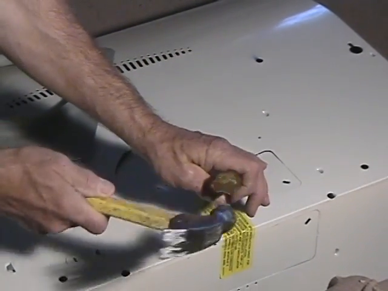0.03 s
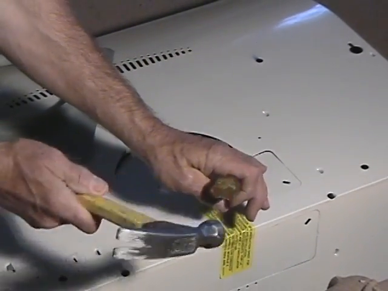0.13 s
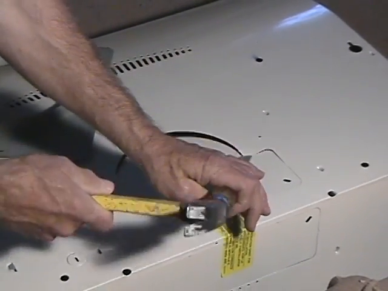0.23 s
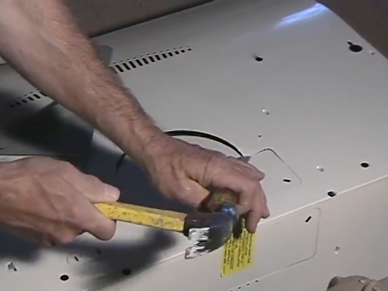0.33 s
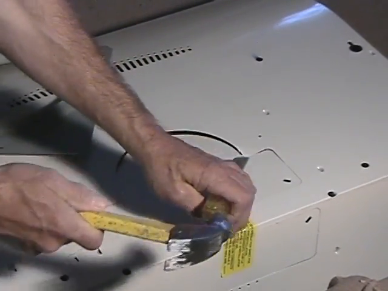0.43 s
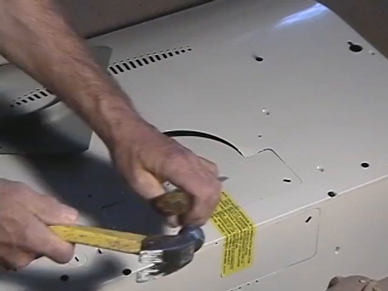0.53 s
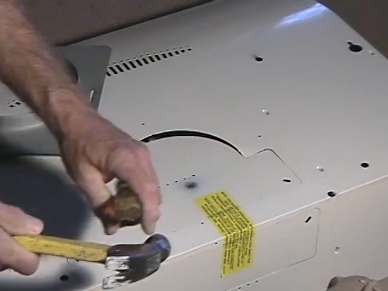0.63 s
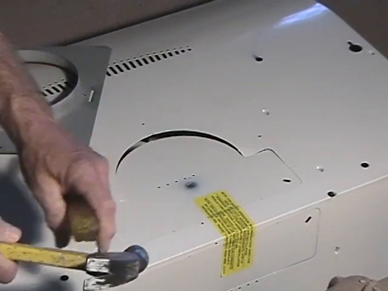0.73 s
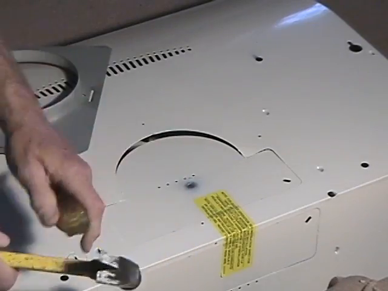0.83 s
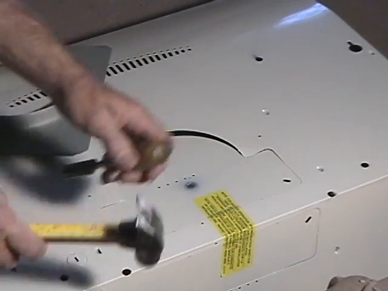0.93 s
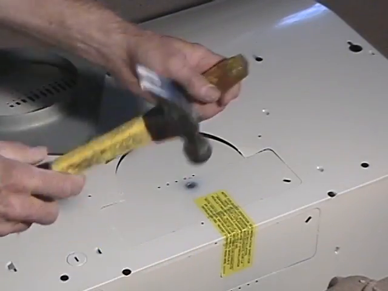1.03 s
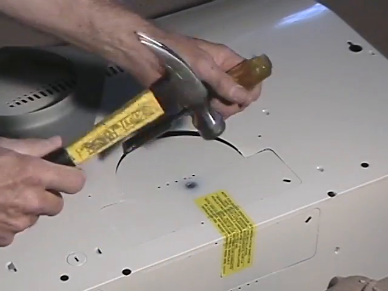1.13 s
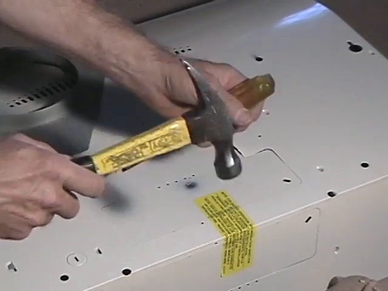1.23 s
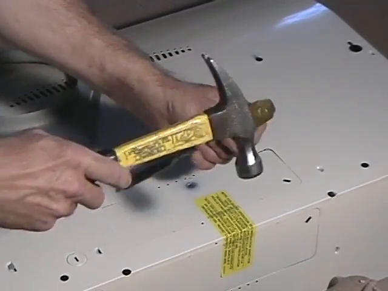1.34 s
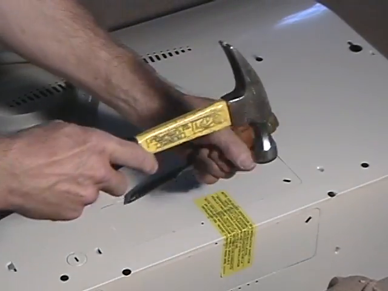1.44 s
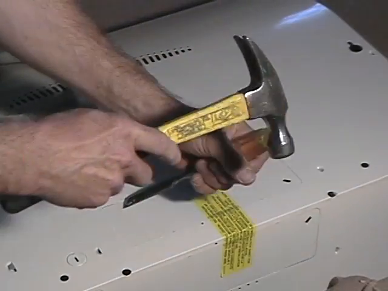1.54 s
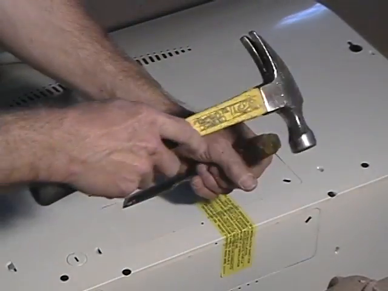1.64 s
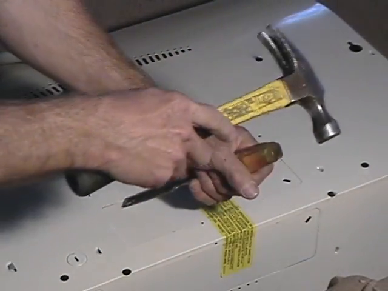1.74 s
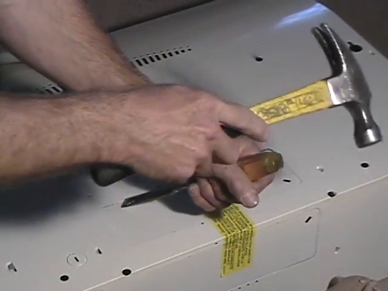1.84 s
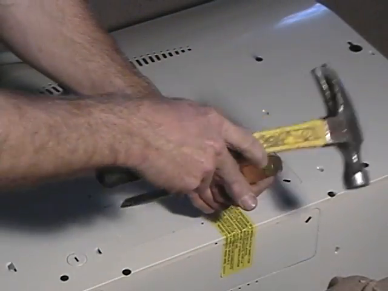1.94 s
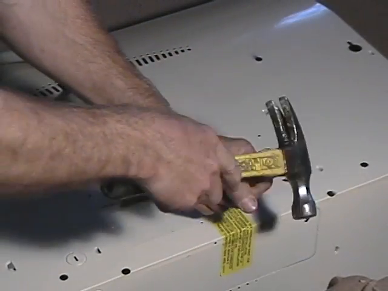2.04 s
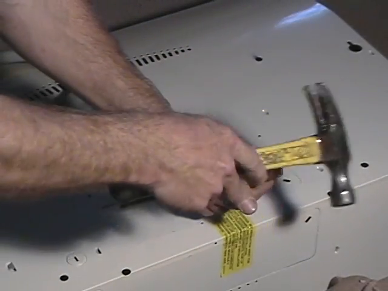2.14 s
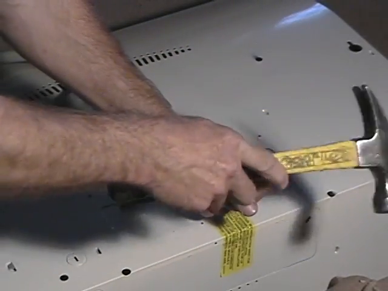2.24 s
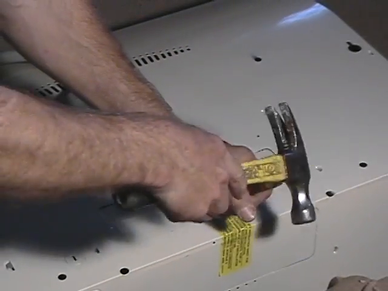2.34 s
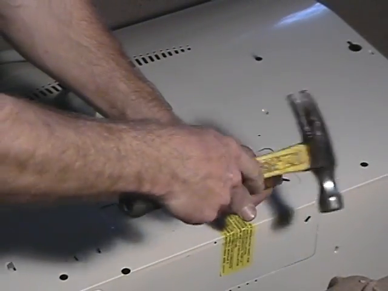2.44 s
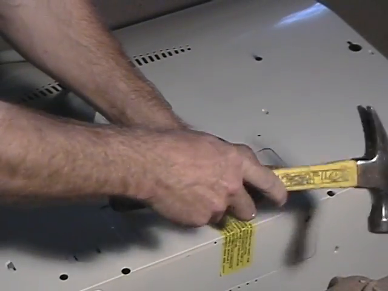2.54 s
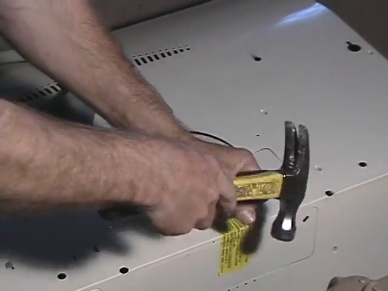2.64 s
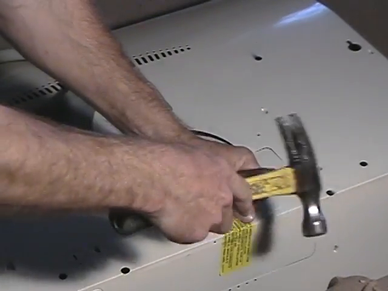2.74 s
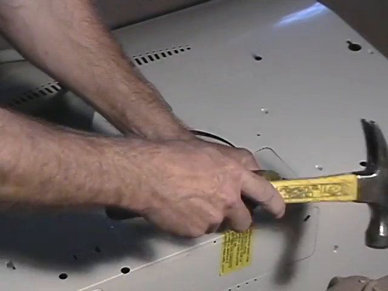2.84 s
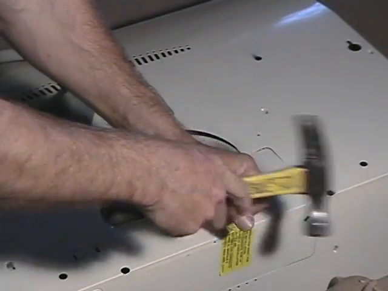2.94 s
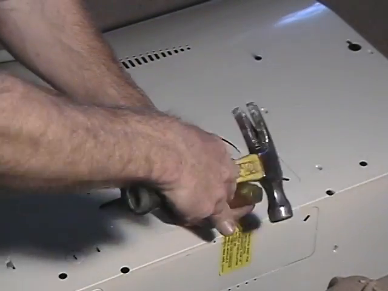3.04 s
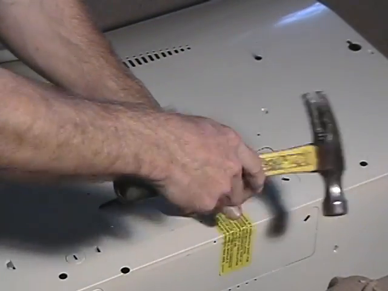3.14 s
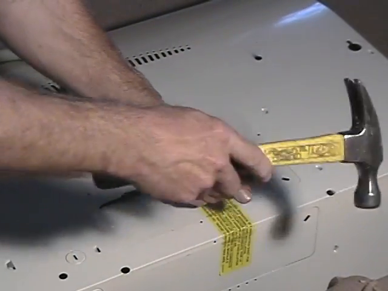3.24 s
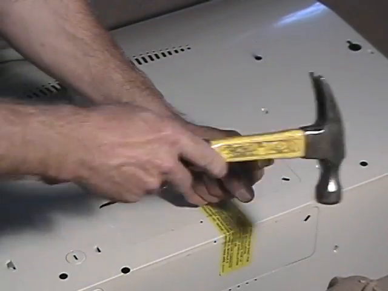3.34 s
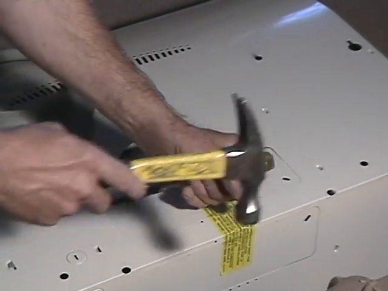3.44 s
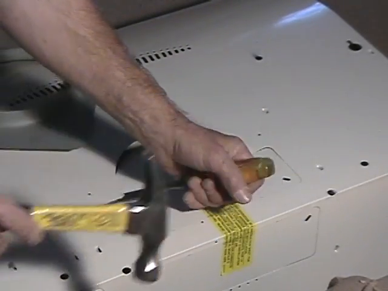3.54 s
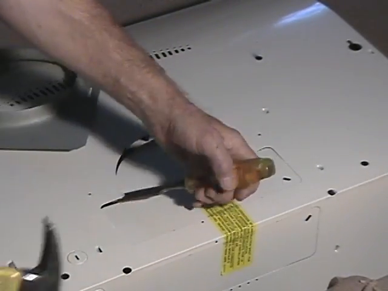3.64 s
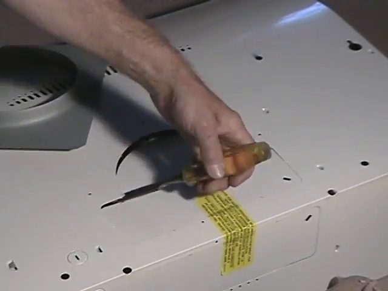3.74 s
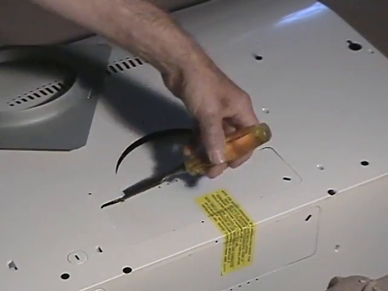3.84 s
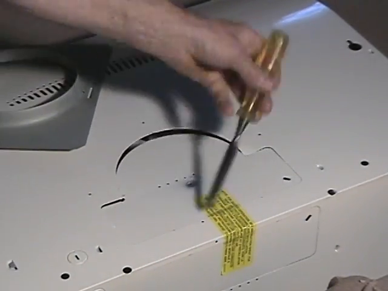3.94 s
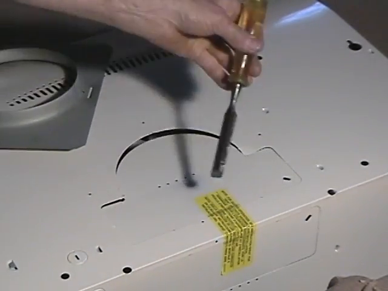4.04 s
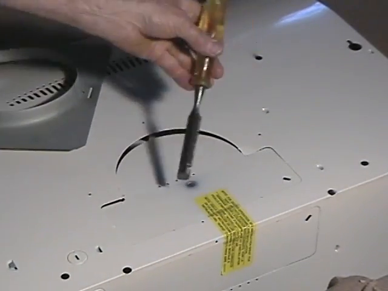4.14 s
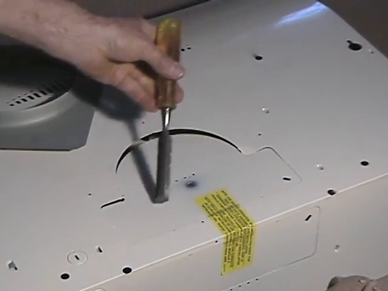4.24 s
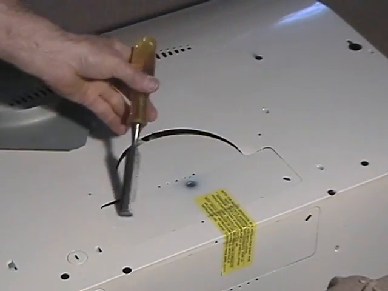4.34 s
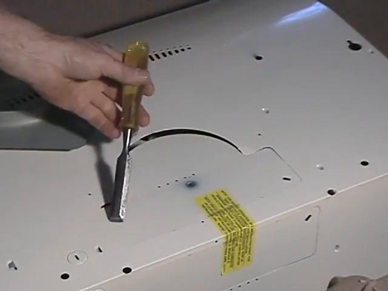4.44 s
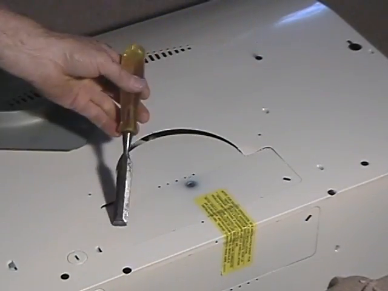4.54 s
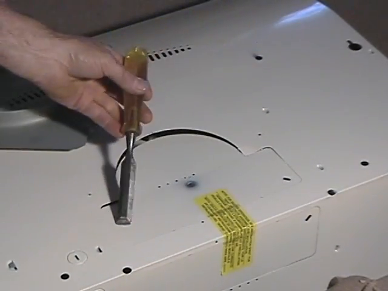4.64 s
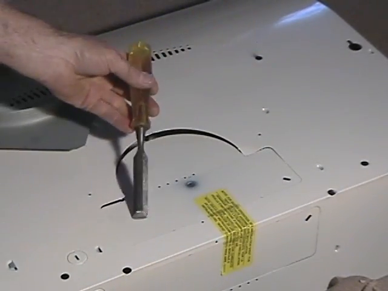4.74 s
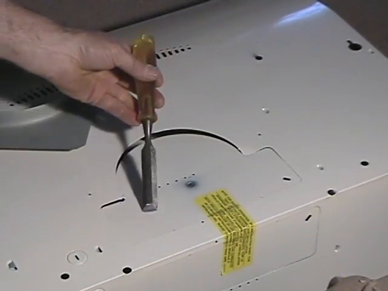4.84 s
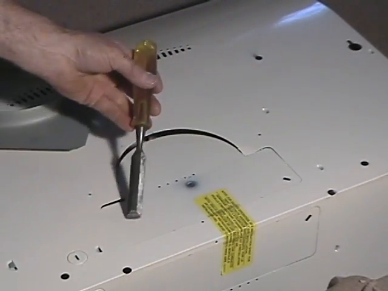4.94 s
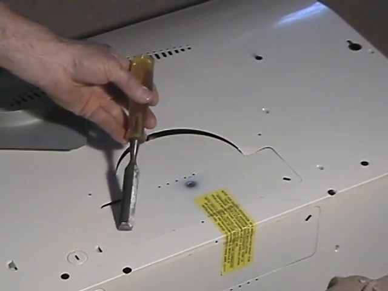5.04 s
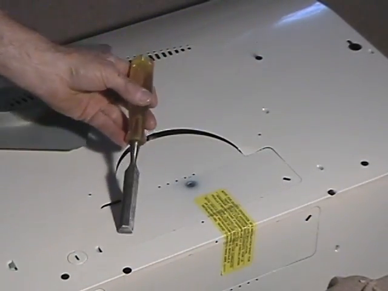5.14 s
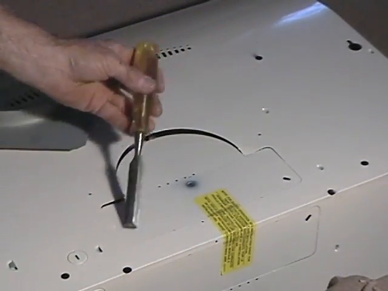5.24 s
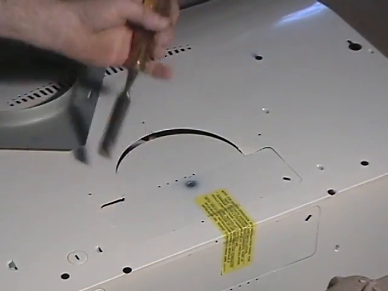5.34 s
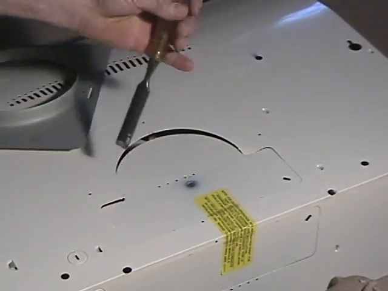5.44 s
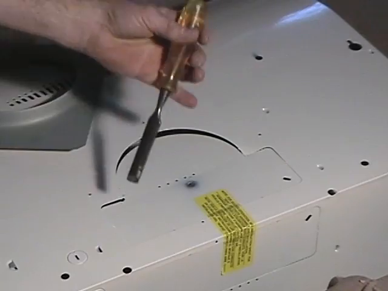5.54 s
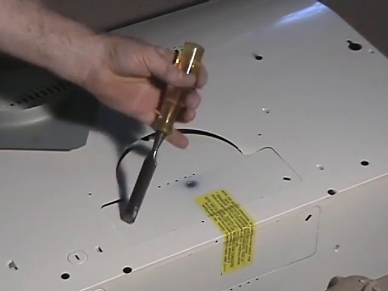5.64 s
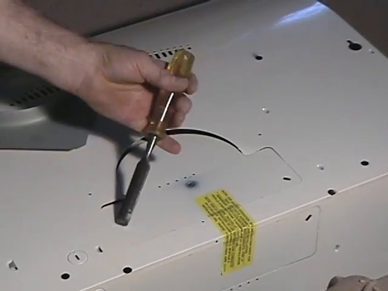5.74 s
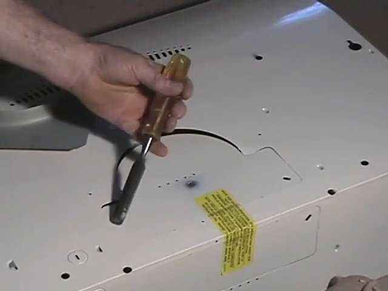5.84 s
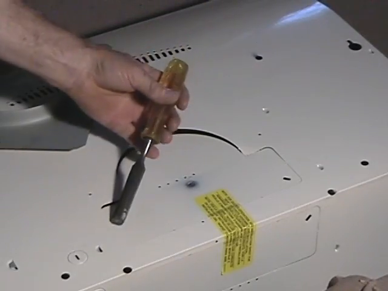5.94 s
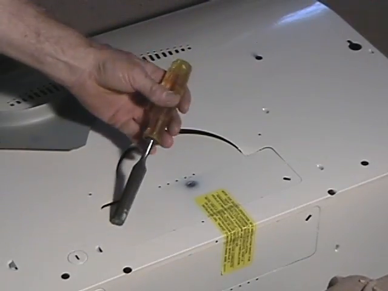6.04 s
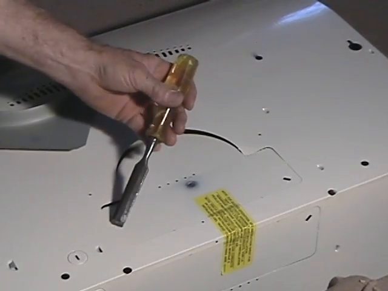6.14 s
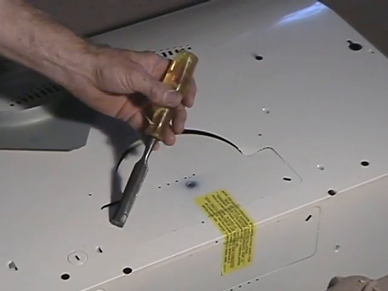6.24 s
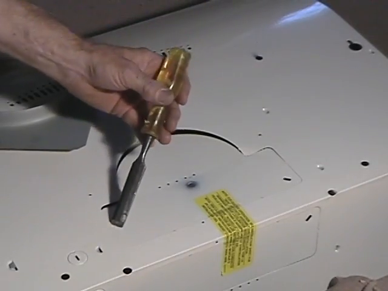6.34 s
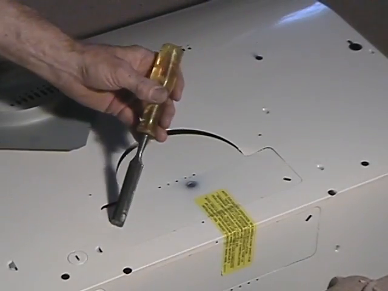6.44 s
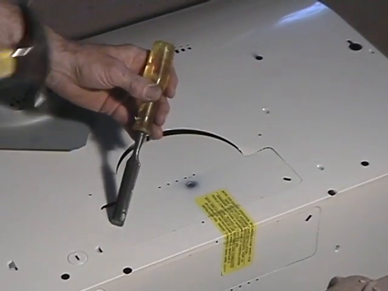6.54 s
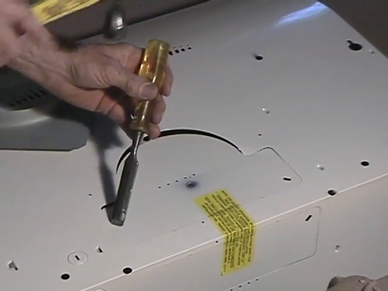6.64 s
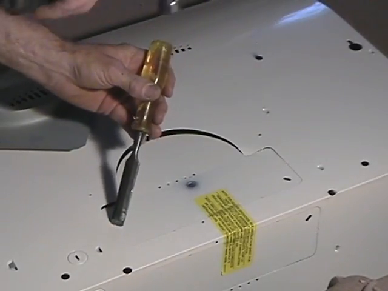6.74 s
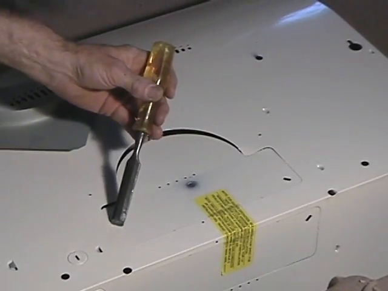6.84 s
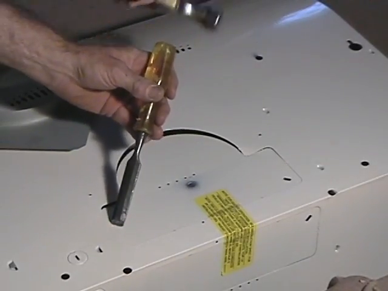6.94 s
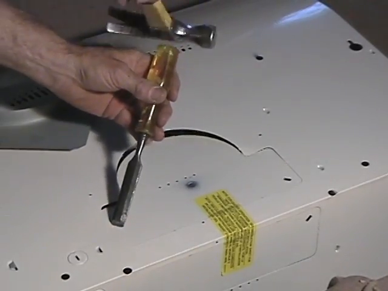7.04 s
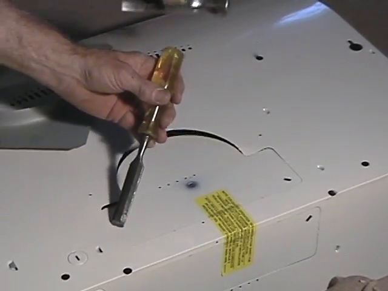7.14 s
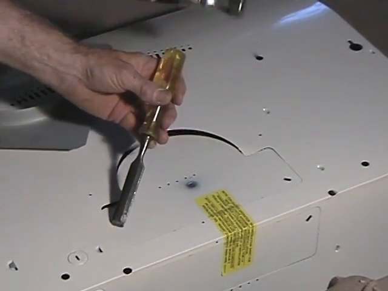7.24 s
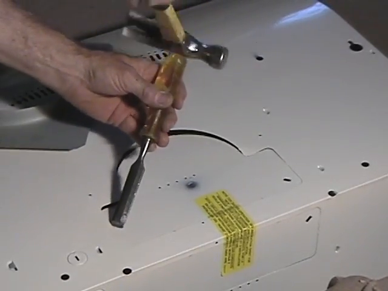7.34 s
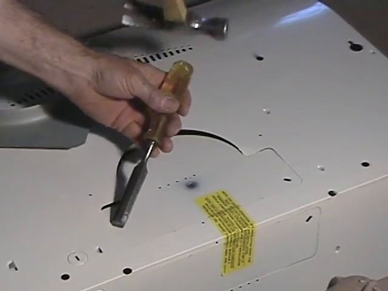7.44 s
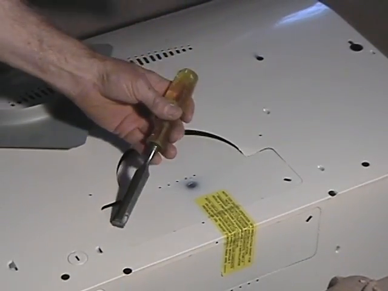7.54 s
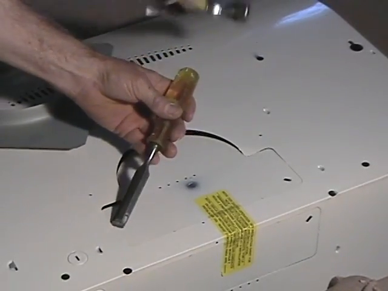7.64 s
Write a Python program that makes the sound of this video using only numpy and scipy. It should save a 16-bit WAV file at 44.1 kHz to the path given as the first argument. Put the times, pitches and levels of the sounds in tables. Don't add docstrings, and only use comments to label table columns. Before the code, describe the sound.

Sharp hammer blows on a chisel clang through a thin sheet-metal cabinet, with light taps and a brief scrape between two runs, over faint ventilation.

```python
import sys
import numpy as np
from scipy import signal
from scipy.fft import rfft, irfft, next_fast_len
from scipy.io import wavfile

SR = 44100
rng = np.random.default_rng(int(sys.argv[2]) if len(sys.argv) > 2 else 0)


def field_ratio(decibels):
    return 10 ** (np.asarray(decibels, dtype=float) / 20)


def inscribe(sig):
    pcm = np.round(np.clip(np.atleast_2d(sig).T, -1, 1) * 32767)
    wavfile.write(sys.argv[1], SR, pcm.astype(np.int16))


N = 339570
LEAD = 4410
BAND_EDGES_HZ = 25 * 2 ** np.arange(0, 9.5, 1 / 3)

# (time [s], peak [dB], treble [dB], bass [dB], long ring [dB])
BLOWS = [
    (0.252, -11, -11, -22, -7),
    (2.036, -8.5, -12, -15, -17.5),
    (2.354, -9.5, -11.5, -13, -10),
    (2.656, -11, -10.5, -16, -19.5),
    (2.989, -11.5, -9, -15, -17.5),
    (7.011, -9, -13.5, -13, -7),
    (7.329, -9, -10.5, -18.5, -11.5),
]
# (time [s], peak [dB], treble [dB], bass [dB], long ring [dB])
TAPS = [(1.527, -31.5, -28, -3, -2), (3.874, -31.5, -40, -15, -15), (1.561, -27, -19.5, -13, -4.5),
        (4.291, -9, -10.5, -23, -8.5), (4.339, -13.5, -39, -5.5, -13), (4.409, -14, -20.5, -28, -27),
        (4.768, -41.5, -17, 5, -27), (5.049, -29.5, -20.5, -37, -4), (5.096, -28.5, -46, -27, -13),
        (5.311, -44, -23, -12, -5), (5.688, -19, -10.5, -11, -17), (5.711, -21.5, -27, -16, -3.5),
        (5.808, -18.5, -21, -16, -25)]
# (time [s], peak [dB], treble [dB], bass [dB], long ring [dB])
EARLIER_BLOW = [(-0.036, -11, -11.5, -17.5, -20)]
CONTACTS = EARLIER_BLOW + BLOWS + TAPS
# (time [s], bite [dB])
DRAG_BITE = [
    (3.872, -78),
    (3.885, -60),
    (3.904, -37.5),
    (3.934, -32),
    (3.955, -51),
    (4.005, -54.5),
    (4.03, -74),
    (4.07, -75),
]
# (time [s], peak [dB], fade [dB/s])
SIZZLES = [(0.105, -38, 115), (0.391, -36, 450), (0.444, -39, 64), (0.611, -42.5, 230), (0.668, -54, 200),
           (0.785, -49.5, 302), (1.02, -65, 25), (2.43, -44, 400), (2.5, -46.5, 72), (2.62, -63, 100),
           (2.8, -52, 220), (4.298, -33, 250), (4.415, -48, 150), (5.265, -56.5, 150), (5.36, -65, 80),
           (6.05, -63, 10), (6.15, -72, 25), (7.014, -22, 302), (7.15, -48, 350), (7.224, -43, 700),
           (7.28, -45, 353), (7.332, -38, 300), (7.595, -62, 393)]
# (frequency [Hz], density [dB per Hz])
SHEET_COLOUR = [(35, -63), (60, -38), (136, -14), (217, -12), (427, -4), (621, -6.5), (698, -7), (749, -10),
                (968, -7), (1580, -8.5), (1910, -10.5), (4640, -19.5), (9350, -21.5), (13300, -16.5),
                (16000, -37)]
# (frequency [Hz], density [dB per Hz])
SIZZLE_COLOUR = [(2000, -10), (5000, -4), (9000, -7.5), (11500, -9.5), (14000, -16.5), (16000, -13)]
# (frequency [Hz], T60 [s])
FAST_T60 = [(100, 0.93), (300, 0.39), (1000, 0.49), (3000, 0.36), (7000, 0.31), (14000, 0.18)]
# (frequency [Hz], T60 [s])
LONG_T60 = [(100, 2.5), (300, 1.28), (1000, 0.83), (3000, 0.7), (7000, 0.54), (14000, 0.37)]
# (frequency [Hz], T60 [s], first spot [dB], second spot [dB], set-down [dB], last
# spot [dB])
PANEL_MODES = [(158, 0.54, -16, -12, -12, -17.5), (213.2, 1, -18, -32, -22.5, -23),
               (250, 1, -16.5, -18, -14, -20.5), (282, 1, -15, -16.5, -11, -13),
               (345.3, 0.27, -8.5, -22, -6, -17), (392, 0.9, -12, -11, -9.5, -7),
               (448, 0.37, -11, -4, -4.5, -11), (488.5, 1, -17, -26, -11, -30),
               (560, 0.36, -1.5, 4.5, -7.5, 1), (683, 1, -14.5, -18.5, -12.5, -17),
               (782.4, 0.86, -21.5, -22, -14.5, -19), (815, 0.18, -3.5, -32.5, -17, -20),
               (970, 0.41, -6.5, -2.5, -6.5, -7), (1076, 0.26, 1, -2, -6, -7), (1229, 0.18, 3.5, -6, -0.5, -13),
         (1334, 0.21, 3, 3, 0, -25), (1417, 0.23, -9, 2, -2.5, -16), (1430, 0.48, -28, -11, -12.5, -14),
         (1585, 0.32, -21, -13.5, -11, -5), (1667, 0.093, 2.5, -5, -3, -17), (1755, 0.21, 1, 3, -26, -13),
         (1871, 0.085, -26, -8.5, -2, 2.5), (2140, 0.37, -31, -5.5, -5.5, -10),
         (2336, 0.27, -9, -4.5, -8, -8)]
# (frequency [Hz], left-right likeness [-1..1])
SHEET_LIKENESS = [(60, 0.84), (250, 1), (500, 0.99), (1000, 0.96), (2000, 0.8), (4000, 0.69), (8000, 0.52),
                  (13000, 0.52)]
# (frequency [Hz], left minus right [dB])
SHEET_BALANCE = [(700, -0.8), (2000, -0.5), (4000, -1), (8000, 0.9), (13000, -1.5)]
# (frequency [Hz], density [dB per Hz])
ROOM_COLOUR = [(25, -27), (60, -12), (90, -19.5), (130, -4), (250, -1), (450, -2), (700, -5.5), (1400, -9),
               (2000, -12.5), (3000, -19), (4500, -22), (6000, -23), (12000, -24), (16000, -27)]
# (frequency [Hz], left-right likeness [-1..1])
ROOM_LIKENESS = [(60, 0.28), (150, 0.77), (380, 1), (950, 0.89), (2380, 0.39), (5980, -0.085),
                 (15000, -0.31)]
# (frequency [Hz], level [dB rms])
WHISTLES = [(60, -82.5), (4527, -78), (15735, -76)]
# (frequency [Hz], width [Hz], level [dB rms])
DUCTS = [(477, 91, -60.5), (1050, 76, -87), (1480, 100, -61.5), (1650, 50, -83), (4330, 220, -73)]
PANEL_RING = [1.17, 0.86, 0.62, 0.91]
SHEET_RING = [1.565, 1.176, 0.84, 0.98]
PLACE_FROM_S = [1.2, 3.5, 6.5]
SET_DOWN = 2
# (frequency [Hz], width [Hz], level [dB])
LOOSE_PARTS = [(8900, 65, -11.5), (9250, 41, -13.5), (10680, 140, 0), (11100, 32, 1), (11200, 160, -5.5),
               (11400, 25, -15), (12100, 64, 1), (12600, 130, -2), (13500, 68, 0.5), (11800, 28, -9),
               (13700, 75, 0), (13050, 35, -5), (14500, 46, -4), (15100, 71, -5)]
# (frequency [Hz], level [dB], T60 [s])
STEEL_MODES = [(1500, -1.5, 0.011), (2570, -0.5, 0.004), (4640, -6, 0.0021), (6850, -8, 0.003),
               (12500, -7, 0.002)]
# (frequency [Hz], level [dB], T60 [s])
FREE_PANELS = [(190, -48.5, 2.7), (249.3, -36.5, 2.27), (390, -38.5, 1.63), (476, -54, 1.6),
               (549, -35, 1.8), (711, -38, 1.97), (985, -39.5, 1.73)]
# (time [s], frequency [Hz], level [dB])
NOTES = [(.002, 1350, -26.5), (.002, 560, -27.5), (0.256, 950, -26), (0.255, 1110, -28),
         (1.526, 392.5, -35), (2.038, 560, -30), (2.036, 1050, -21), (2.038, 392, -27.5),
         (2.358, 1670, -22), (2.359, 419, -28), (2.66, 1187, -21), (2.66, 1399, -26), (2.661, 158, -35.5),
         (2.993, 436.5, -26), (5.851, 1450, -34.5), (3.95, 392, -30), (4.301, 260.4, -24.5),
         (4.3, 305, -30), (4.418, 267, -46), (5.05, 1122, -39), (5.095, 1430, -37.5), (5.096, 1214, -33.5),
         (5.699, 158, -41), (5.712, 1480, -30.5), (5.82, 1430, -38), (5.82, 477, -44), (7.015, 692, -25),
         (7.021, 395, -29), (7.332, 676, -31), (7.339, 395, -32)]
NOTCHES = [(1, 0.82, 0.73), (2, 0.87, 0.76)]


def sheet():
    buzz = edge_sizzle() * field_ratio(2.0 * drift(120))
    out = 0
    for hz, pair in bands():
        struck = field_ratio(2 * at_hz(SHEET_COLOUR, hz) + 2 * 7.58) * sheet_energy(hz)
        loose = (field_ratio(at_hz(SIZZLE_COLOUR, hz) + 6.0) * buzz) ** 2
        lean = field_ratio(at_hz(SHEET_BALANCE, hz) / 2 * np.array([[1], [-1]]))
        out = out + np.sqrt(struck + loose) * lean * spread(pair, at_hz(SHEET_LIKENESS, hz))
    shaking = buzz + field_ratio(-22) * drag_gain() + field_ratio(-35) * np.sqrt(sheet_energy(11000))
    return out + loose_parts(shaking)


def sheet_energy(hz):
    energy = np.zeros(N)
    fast_s, long_s = at_hz(FAST_T60, hz), at_hz(LONG_T60, hz)
    rise_s = 0.00014 + 2.6 / hz
    for s, db, treble_db, bass_db, ring_db in CONTACTS:
        place = np.searchsorted(PLACE_FROM_S, s) if db > -25 else SET_DOWN
        length = SHEET_RING[place]
        soft_rise_s = 0.004 * (place == SET_DOWN and db > -25)
        soft_top_db = -9.0 * (place == SET_DOWN)
        first = max(round(s * SR), 0)
        t = np.arange(first, min(first + SR, N)) / SR - s
        tilt_db = at_hz([(200, bass_db + 11), (400, 0.0027), (2000, 0.018), (5000, treble_db + 11),
                         (11000, treble_db + 12), (15000, treble_db + 16.5 + soft_top_db)], hz)
        dying = field_ratio(-120 * t / (fast_s * length)) + field_ratio(2 * ring_db - 120 * t / (long_s * length))
        rising = (1 - np.exp(-np.abs(t) / (rise_s + soft_rise_s))) ** 2
        energy[first:first + len(t)] += field_ratio(2 * (db + tilt_db)) * dying * rising
    share = at_hz([(2500, 0), (5000, 0.38)], hz)
    drag = drag_push() ** (1 - share) * (field_ratio(10.0) * drag_gain()) ** share
    drag = drag * field_ratio(at_hz([(150, -0.91), (400, -1.1)], hz))
    grit = field_ratio(0.65 * drift(83))
    return energy + (field_ratio(8.5) * drag * grit) ** 2


def panel():
    level_db, luck_db, pair_gap = -17.5, 5, 0.013
    rows = np.array(CONTACTS)
    at = LEAD + np.round(rows[:, 0] * SR).astype(int)
    spot = np.searchsorted(PLACE_FROM_S, rows[:, 0])
    spot[rows[:, 1] < -25] = SET_DOWN
    modes = PANEL_MODES
    luck = rng.standard_normal((len(rows), len(modes), 2))
    bites = np.r_[np.zeros(LEAD), drag_push() * rng.standard_normal(N)] * field_ratio(-35)
    out = np.zeros(N + LEAD)
    for place, length in enumerate(PANEL_RING):
        here = spot == place
        start, stop = at[here].min(), min(at[here].max() + SR, N + LEAD)
        for k, (hz, t60, *spot_db) in enumerate(modes):
            for twin in range(2):
                clicks = 1e-18 + bites[start:stop] * (place == SET_DOWN)
                size = field_ratio(rows[here, 1] + level_db + luck_db * luck[here, k, twin])
                clicks[at[here] - start] += size * (-1) ** (k + twin * k // 2)
                pitch_hz = hz * (1 + pair_gap * (twin - .5))
                out[start:stop] += field_ratio(spot_db[place]) * ring(clicks, pitch_hz, t60 * length)
    return (out + cracks(rows, at))[LEAD:]


def cracks(rows, at):
    sizes = field_ratio(rows[:, 1] + .5 * (rows[:, 2] + 12.5) - 2.5)
    laid = (np.searchsorted(PLACE_FROM_S, rows[:, 0]) == SET_DOWN) & (rows[:, 1] > -19)
    sizes = sizes * field_ratio(-4 * laid)
    clicks = np.zeros(N + LEAD)
    clicks[at] = sizes
    late = rng.random((len(rows), 7))
    sign = rng.choice([-1, 1], (len(rows), 7))
    echo_at = at[:, None] + (SR * (0.0014 + 0.016 * late)).astype(int)
    np.add.at(clicks, echo_at, sizes[:, None] * sign * field_ratio(-4 - 8.1 * late))
    return signal.fftconvolve(clicks, steel_knock())[:N + LEAD]


def steel_knock():
    t = np.arange(SR // 50) / SR
    return sum(field_ratio(db - 60 * t / t60) * np.sin(2 * np.pi * hz * t) for hz, db, t60 in STEEL_MODES)


def free_rings():
    let_go_s, beat_gap = .27, .018
    rings = [(let_go_s, *mode, -.6) for mode in FREE_PANELS]
    rings += [(s, hz, db, 0.39 * (hz / 500) ** -0.37, .5) for s, hz, db in NOTES]
    out = np.zeros(N)
    for s, hz, db, t60, twin in rings:
        start = round(s * SR)
        click = np.full(min(SR, N - start), 1e-18)
        click[0] = field_ratio(db)
        out[start:start + SR] += ring(click, hz, t60) + twin * ring(click, hz * (1 + beat_gap), t60)
    return out


def drag_gain():
    return stroke(DRAG_BITE, 1)


def drag_push():
    follows, push_db, t60_s = 0.61, -7, 0.4
    bite = drag_gain()
    r = field_ratio(-120 / (t60_s * SR))
    stored = signal.lfilter([1 - r], [1, -r], bite ** (2 * follows) * (bite > 1e-5))
    return field_ratio(push_db) * np.sqrt(stored)


def edge_sizzle():
    rise_s, lasts_s = 0.0042, .165
    out, t = np.zeros(N + SR), np.arange(SR // 2) / SR
    for s, db, fade_db in SIZZLES:
        stops = np.clip((lasts_s - t) / (4 * rise_s), 0, 1)
        swell = 1 - np.exp(-t / rise_s)
        out[round(s * SR):][:len(t)] += field_ratio(db - fade_db * t) * swell * stops
    return out[:N]


def loose_parts(shaking):
    white = rng.standard_normal((2, N))
    lines = sum(field_ratio(db + 5.0 * drift(20)) * narrow(white, hz, min(width_hz, 60))
                for hz, width_hz, db in LOOSE_PARTS)
    return field_ratio(-3.5) * shaking * spread(rms_one(lines), 0.14) / np.sqrt(2)


def room_tone():
    murmur = sum(field_ratio(at_hz(ROOM_COLOUR, hz) + 1.16 * drift(8.1)) * spread(pair, at_hz(ROOM_LIKENESS, hz))
                 for hz, pair in bands())
    t = np.arange(N) / SR
    tones = sum(np.sqrt(2) * field_ratio(db) * np.sin(2 * np.pi * hz * t) for hz, db in WHISTLES)
    white = rng.standard_normal(N)
    ducts = sum(field_ratio(db) * narrow(white, hz, width_hz) for hz, width_hz, db in DUCTS)
    return field_ratio(-49.5) * rms_one(murmur) + tones + ducts


def gain_control():
    leak_s, lag_s, knee, pull_db = .9, .03, .85, 17.0
    since = np.arange(N) / SR - np.array(EARLIER_BLOW + BLOWS)[:, :1]
    since = np.maximum(since, 0)
    load = np.sum(np.exp(-since / leak_s) * (1 - np.exp(-since / lag_s)), axis=0)
    return field_ratio(-pull_db * np.maximum(load - knee, 0))


def ring(clicks, hz, t60):
    build_cycles = 2.3
    w = 2 * np.pi * hz / SR
    r, soft = field_ratio(-60 / (t60 * SR)), field_ratio(-60 * hz / (build_cycles * SR))
    push = signal.lfilter([1 - soft, 0, soft - 1], [1, -2 * soft * np.cos(w), soft * soft], clicks)
    return signal.lfilter([0, np.sin(w)], [1, -2 * r * np.cos(w), r * r], push)


def narrow(white, hz, width_hz):
    r = np.exp(-np.pi * width_hz / SR)
    return rms_one(signal.lfilter([1, 0, -1], [1, -2 * r * np.cos(2 * np.pi * hz / SR), r * r], white))


def bands():
    white = rng.standard_normal((2, 2, N + LEAD))
    for k, (low, high) in enumerate(zip(BAND_EDGES_HZ, BAND_EDGES_HZ[1:])):
        sos = signal.butter(2, [low, high], "band", fs=SR, output="sos")
        yield np.sqrt(low * high), signal.sosfilt(sos, white[k % 2])[:, LEAD:]


def spread(pair, alike):
    alike = np.clip(alike, -1, 1)
    return np.sqrt(1 + alike) * pair[0] + np.sqrt(1 - alike) * pair[1] * [[1], [-1]]


def drift(rate_hz):
    r = np.exp(-80 * np.pi * rate_hz / SR)
    slow = signal.lfilter([1], [1, -2 * r, r * r], rng.standard_normal(N // 40 + 2002))[2000:]
    return np.interp(np.arange(N) / 40, np.arange(len(slow)), rms_one(slow))


def stroke(rows, column):
    rows = np.array(rows)
    return field_ratio(np.interp(np.arange(N) / SR, rows[:, 0], rows[:, column], left=-120, right=-120))


def at_hz(points, hz):
    points = np.array(points)
    return np.interp(np.log(hz), np.log(points[:, 0]), points[:, 1])


def rms_one(x):
    return x / np.sqrt(np.mean(x ** 2) + 1e-20)


def butter(order, hz, kind, x):
    return signal.sosfilt(signal.butter(order, hz, kind, fs=SR, output="sos"), x)


def scene():
    top_cut = signal.cheby2(10, 40, 16500, fs=SR, output="sos")
    metal = signal.sosfilt(top_cut, sheet() + panel() + free_rings())
    thump = field_ratio(-10.5) * butter(2, 60, "low", metal)
    metal = butter(4, 151, "high", metal)
    rumble = butter(2, 80, "low", rng.standard_normal((2, N)))
    return metal + thump + gain_control() * room_tone() + field_ratio(-79) * spread(rms_one(rumble), 0.37)


def band_limit(x):
    return signal.sosfilt(signal.butter(12, 16820, fs=SR, output="sos"), x)


def record(dry):
    notch_hz = 300
    size = next_fast_len(N + SR)
    hz = np.arange(size // 2 + 1) * SR / size
    response = np.ones(len(hz), complex)
    for multiple, zero, pole in NOTCHES:
        turn = np.exp(-2j * np.pi * hz / (notch_hz * multiple))
        response *= (1 - zero * turn) / (1 - pole * turn)
    notched = irfft(rfft(dry, size) * response, size)[:, :N]
    mix = 1.348 * np.tanh(notched / 1.657)
    return band_limit(mix)


dry = scene()
out = record(dry)
inscribe(out)
```